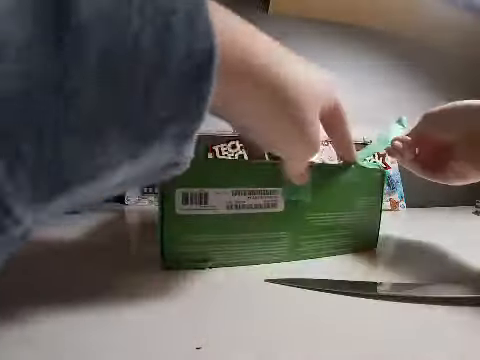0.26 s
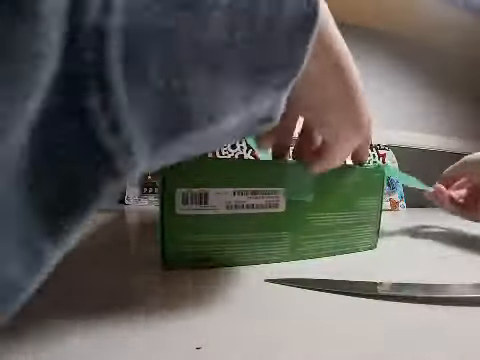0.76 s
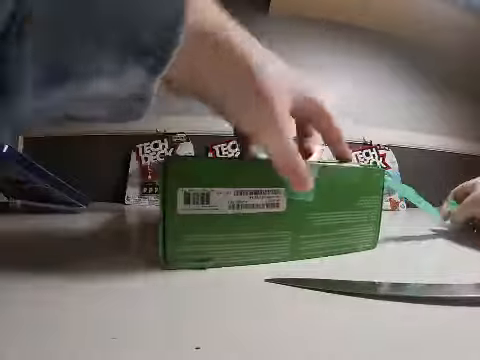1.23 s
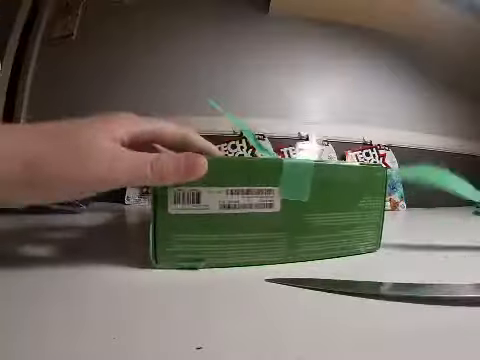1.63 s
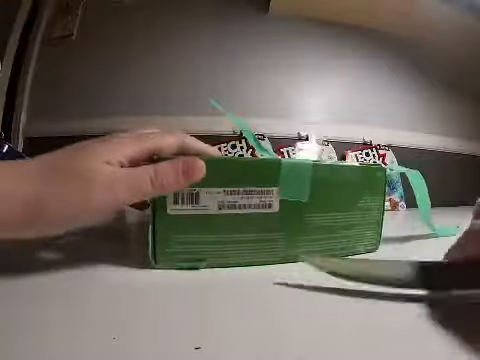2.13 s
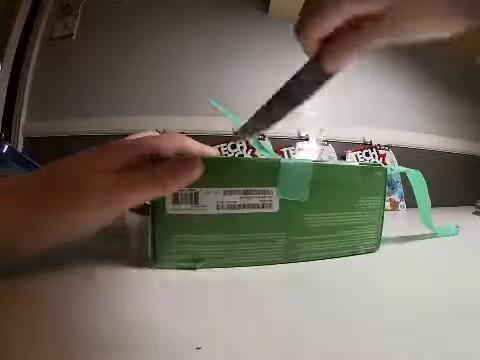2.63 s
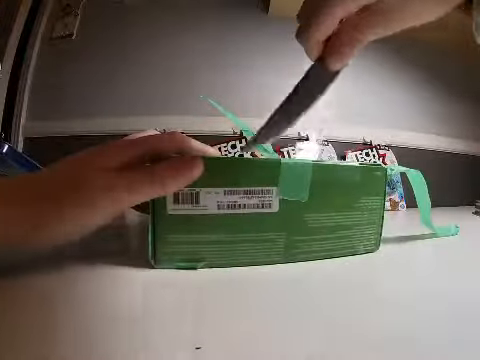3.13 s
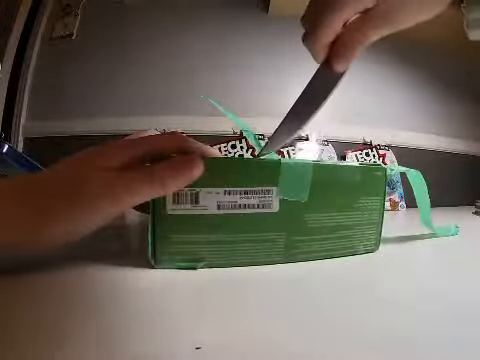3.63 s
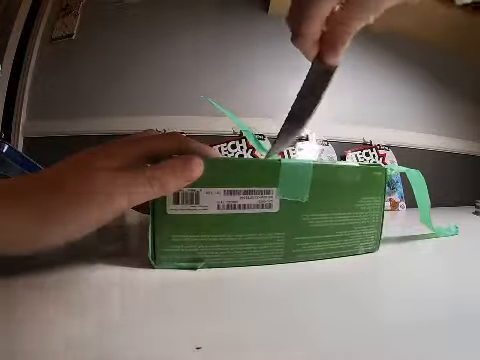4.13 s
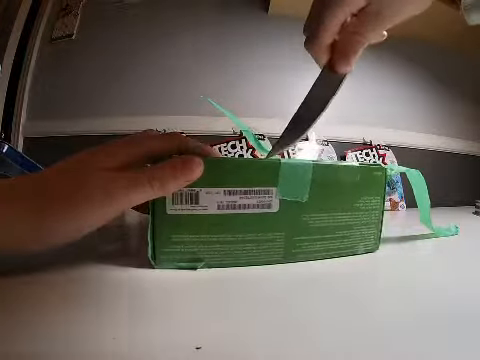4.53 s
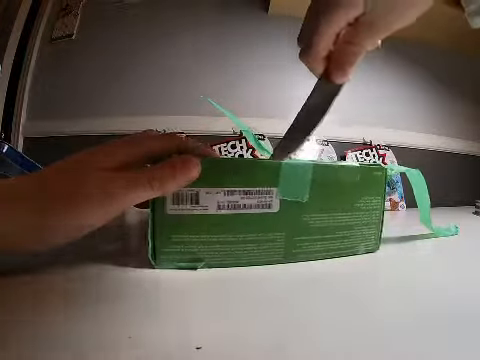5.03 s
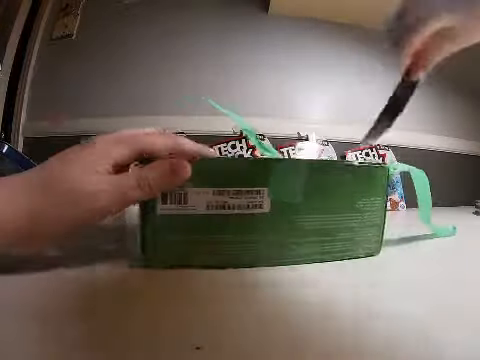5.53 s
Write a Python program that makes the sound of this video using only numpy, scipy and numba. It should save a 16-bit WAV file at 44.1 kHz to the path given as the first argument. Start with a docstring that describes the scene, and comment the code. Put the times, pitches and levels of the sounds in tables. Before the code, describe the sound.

A close, nearly mono desk-top scene in a small, quiet room. From 0 to 1.4 s, tape comes off a light cardboard box in uneven, gritty jerks: a strong hollow finger knock at 0.2, rips and snaps around 0.4, 0.8, 1.03 and 1.35, with low papery rubs, faint sliding squeaks and soft sleeve hiss between. Sparser snaps follow at 1.7 and 1.8, then a box bump at 1.97. At 2.3 a knife leaves the desk with one loud, hard, short clack. Around 2.75 to 3.25 the blade taps and scratches thinly, with a fuller thump at 3.24. It is mostly quiet until 4.3, apart from a dull tap at 3.6; then tiny woody catches and scrapes build from 4.6. At 5.07 to 5.25 the seam rips in loud crackling tears and heavy hollow thuds. Small scratches at 5.5 and a tick at 5.75 end it. A low, wavering hum swells and drops over faint room noise.

```python
"""Packing tape is peeled off a small cardboard box on a desk: bursts of stick-slip grit through gliding resonances.
Tape and blade tick and snap (ringing noise bursts); the strip sings (narrow resonances).
Fingers rub and knock the box (ringing modes); a knife is taken up with a clack, then pokes, scratches and
rips the seam: grit through film and card resonances. A sleeve swishes (comb-filtered hiss); a low hum
comes and goes over faint room noise. Close and nearly mono, with a short room tail."""
import sys
import numpy as np
from scipy import signal
from scipy.fft import rfft, irfft
from scipy.io import wavfile
from numba import njit

SR = 44100
rng = np.random.default_rng(int(sys.argv[2]) if len(sys.argv) > 2 else 0)


def dump(signal):
    """Clip the signal to [-1, 1] and save it as 16-bit WAV at the path in sys.argv[1]."""
    limited = np.clip(np.atleast_2d(signal).T, -1, 1)
    pcm = np.round(limited * 32767).astype(np.int16)
    wavfile.write(sys.argv[1], SR, pcm)


N = 254016
TIME = np.arange(N) / SR


def undb(db):
    """Decibels to gain."""
    return 10 ** (np.asarray(db) / 20)


def unit(x):
    """Scale to rms 1."""
    return x / np.sqrt(np.mean(x ** 2))


def at_peak(x, db):
    """Scale to a peak level in dB."""
    return x * undb(db) / np.abs(x).max()


def add(track, s, sound):
    """Mix a sound into the track at time s."""
    start = max(int(s * SR), 0)
    track[start:start + len(sound)] += sound[:max(N - start, 0)]


def low_pass(x, order, hz):
    """Butterworth low-pass."""
    return signal.sosfilt(signal.butter(order, hz, fs=SR, output="sos"), x)


def band(x, hz, q):
    """Two-pole resonance, gain 1 at the centre."""
    g = np.tan(np.pi * min(hz / SR, 0.45))
    numerator = [g / q, 0, -g / q]
    denominator = [1 + g / q + g * g, 2 * (g * g - 1), 1 - g / q + g * g]
    return signal.lfilter(numerator, denominator, x)


@njit
def sweep(x, hz, q):
    """Two-pole resonance whose centre moves, gain 1 at the centre."""
    out, b, low = np.empty(len(x)), 0., 0.
    for i in range(len(x)):
        g = np.tan(np.pi * min(hz[i] / SR, .45))
        v = (b + g * (x[i] - low)) / (1 + g * (g + 1 / q))
        b, low, out[i] = 2 * v - b, low + 2 * g * v, v / q
    return out


def colour(x, points, tilt_db=0):
    """Shape a spectrum by (Hz, dB) points and a tilt in dB per octave; rms 1."""
    hz, db = np.transpose(points)
    octave = np.log2(np.maximum(np.fft.rfftfreq(len(x), 1 / SR), 10))
    gain = undb(np.interp(octave, np.log2(hz), db) + tilt_db * octave)
    return unit(irfft(rfft(x) * gain, len(x)))


def fade(t60, count):
    """Exponential decay, 60 dB down after t60 seconds."""
    return undb(-60 * TIME[:count] / t60)


def ring(modes, count=22050):
    """Blow response of (Hz, dB, t60 s) modes, each shifted slightly at random per contact point."""
    out = np.zeros(count)
    for hz, db, t60 in modes:
        shifted_hz = hz * (1 + 0.015 * rng.standard_normal())
        out += undb(db) * fade(t60, count) * np.sin(2 * np.pi * shifted_hz * TIME[:count])
    return out


def walk(rate):
    """Smooth random curve, spread near 1, with rate knots per second."""
    knots = rng.standard_normal(4096)
    return np.interp(TIME * rate, np.arange(len(knots)), knots)


def slips(rate, spread_db):
    """Stick-slip: tiny releases at random moments, rate per second, of very uneven size."""
    released = rng.random(N) < rate / SR
    size = rng.standard_normal(N)
    return released * size * undb(spread_db * np.clip(rng.standard_normal(N), -2, 2))


def pull(length, attack_s):
    """Force through a stroke: it swells to a rounded top and lets go."""
    times_s = [0, min(attack_s, 1.12 * length), length]
    return np.sin(np.interp(TIME[:int(length * SR)], times_s, [0, np.pi / 2, 0])) ** 1.34


def swell(s, length, attack_s, release_s):
    """Gain that rises at time s, holds and falls."""
    return np.clip(np.minimum((TIME - s) / attack_s, (s + length - TIME) / release_s), 0, 1)


def delayed(x, ms):
    """The sound after a longer path; the delay may move."""
    return np.interp(TIME - ms / 1000, TIME, x)


def crack(hz, top_hz):
    """A sudden release: one sharp edge, a few milliseconds of crackle, a faint rustle."""
    tail_db, tail_t60_s = -21.5, 0.14
    burst = rng.standard_normal(8192)
    burst *= fade(0.01, count=8192) + undb(tail_db) * fade(tail_t60_s, count=8192)
    burst[0] += 2.0
    return band(low_pass(burst, 3, min(top_hz, 0.45 * SR)), hz, q=0.94)


# ring of blade and stiff tape under every scrape: ring_hz, ring_db
SCRAPE_RING = [(835, 4), (1350, -20.5), (2215, 0.5), (3290, -25), (3570, -6), (3820, -5.5), (4820, -20.5),
               (6300, -15), (7850, -12), (9900, -8.5)]
CATCHES_PER_S = 35  # glue and blade catch and let go unevenly


def grit(rate, rough_db, catch_db):
    """Dense slips that come in bursts and ring the blade and the stiff tape."""
    burst_db = rough_db * walk(rate=330) + catch_db * walk(rate=CATCHES_PER_S)
    x = slips(rate, spread_db=1.5) * undb(burst_db)
    return x + sum(undb(db) * band(x, hz, q=28) for hz, db in SCRAPE_RING)


WANDER_OCTAVES, WANDER_PER_S = 0.011, 30  # the point of contact moves
FILM_Q = 10


def scrape(source, surface, s, force, tilt_db, rings):
    """Grit under a changing force, through wandering (Hz, dB, Q) resonances."""
    scratch = colour(source[int(s * SR):][:len(force)], surface, tilt_db)
    wander = 2 ** (WANDER_OCTAVES * walk(rate=WANDER_PER_S)[:len(force)])
    ringing = sum(undb(db) * sweep(scratch, hz * wander, float(q)) for hz, db, q in rings)
    return force * unit(scratch + ringing)


# pulls that peel tape off card: release_s, build_s, t60_s, level_db, tilt_db_per_octave,
# strip_hz (at release), glide_octaves_per_s
PEELS = [(0.135, 0.044, 0.11, -50.5, 12, 12500, 0), (0.18, 0.035, 0.18, -35, 0.5, 2800, -2),
         (0.375, 0.03, 0.17, -42.5, 1, 6500, -10), (0.414, 0.007, 0.16, -33, -0.5, 5700, 3),
         (0.5, 0.2, 0.2, -54.5, 5, 2800, 5), (0.58, 0.27, 0.28, -54, -0.5, 2000, -0.5),
         (0.67, 0.053, 1, -56, -2, 2180, 1), (0.762, 0.063, 0.073, -44.5, 2.5, 8350, -1),
         (0.8, 0.004, 0.14, -34, 4.5, 7740, -0.5), (1.029, 0.015, 0.026, -28, -1, 3500, -3),
         (1.04, 0.015, 0.32, -38, 6.5, 3230, 0), (1.168, 0.015, 0.055, -31.5, -5.5, 2040, -32),
         (1.305, 0.04, 0.19, -45, -0.5, 1450, 11), (1.326, 0.0065, 0.07, -41, 0, 4560, -3),
         (1.362, 0.022, 0.014, -31.5, 0, 5350, 11), (1.366, 0.043, 0.23, -43, 0, 2100, -5.5),
         (1.683, 0.027, 0.082, -37, 3.5, 2490, 1), (1.99, 0.013, 0.18, -46.5, 4, 4920, -1.5)]
# tape lifting off the card: freq_hz, rel_level_db
PEEL_COLOUR = [(150, -6), (400, 12), (900, 2.5), (1500, 5.5), (2000, -1), (2900, -3), (3700, -6.5),
               (5000, -3), (6500, -4.5), (8200, -7.5), (9200, -14), (10200, -17.5), (11800, -32),
               (15000, -35.5)]
PEEL_RING_DB = 7.5  # strip ring re rustle


def peeling():
    """The pull builds until the glue lets go, then dies away; the ring of the strip glides."""
    out = np.zeros(N)
    glue = grit(rate=4000, rough_db=-0.9, catch_db=3.1)
    for release_s, build_s, t60, db, tilt_db, film_hz, glide in PEELS:
        start_s = release_s - build_s
        build = np.linspace(0, 1, int(build_s * SR))
        force = undb(db) * np.r_[build, fade(t60, count=int(t60 * SR))]
        pitch_hz = film_hz * 2 ** (glide * (TIME[:len(force)] - build_s))
        rings = [(pitch_hz, PEEL_RING_DB, FILM_Q)]
        add(out, start_s, scrape(glue, PEEL_COLOUR, start_s, force, tilt_db, rings))
    return out


# sharp ticks and snaps of tape and blade: start_s, peak_db, centre_hz, top_hz, ring_low_hz, ring_high_hz
SNAPS = [(0.1054, -20.5, 2130, 5200, 1590, 3140), (0.131, -33, 8000, 15000, 9500, 12500),
         (0.154, -39, 5000, 14000, 2300, 12960), (0.168, -27, 5000, 14000, 2780, 5850),
         (0.174, -18.5, 1120, 13000, 1120, 2730), (0.368, -33, 8000, 15000, 6700, 11000),
         (0.371, -28, 7000, 15000, 6700, 12600), (0.411, -19.5, 6000, 14800, 4000, 5640),
         (0.7965, -20, 6900, 10000, 4700, 7200), (1.018, -24.5, 3040, 9650, 1580, 3400),
         (1.0232, -15.5, 5500, 10600, 3250, 5840), (1.027, -19.5, 5550, 10600, 4370, 7300),
         (1.3565, -22.5, 2030, 7500, 2120, 4930), (1.426, -26.5, 3160, 7860, 3350, 6400),
         (1.645, -41, 1830, 6000, 1474, 2680), (1.6645, -25, 3550, 9650, 2300, 8500),
         (1.681, -16, 2550, 9800, 2300, 3100), (1.687, -22.5, 4550, 9650, 4900, 7400),
         (1.834, -17, 3060, 9500, 3250, 7300), (1.967, -26.5, 4160, 9650, 2000, 5230),
         (1.991, -41, 3050, 9650, 3330, 4800), (2.041, -36.5, 4500, 8400, 3250, 5400),
         (2.1035, -36, 1720, 8000, 1520, 2410), (2.327, -46, 7500, 8870, 6700, 7750),
         (2.756, -33, 5010, 8900, 3980, 7500), (2.9681, -35, 4400, 9700, 4030, 6600),
         (3.1592, -19.5, 3430, 9000, 2460, 5300), (3.2405, -29, 5900, 9000, 5770, 7270),
         (3.627, -39.5, 6000, 9000, 5400, 7200), (4.675, -42, 4040, 7500, 4070, 6600),
         (4.925, -37, 4500, 7480, 3800, 6260), (4.983, -44, 2940, 9750, 2670, 6600),
         (5.1476, -10, 3950, 11500, 3500, 3900), (5.1662, -8.5, 1570, 6500, 1230, 1550),
         (5.1698, -22.5, 6960, 10500, 6850, 10140), (5.2308, -22.5, 4300, 8030, 4250, 4700),
         (5.7479, -23.5, 5300, 10000, 4660, 6600)]
SNAP_RING_DB = -7  # each ring re crack


def ticks_and_snaps():
    """A sharp crack with two ringing pitches."""
    out = np.zeros(N)
    for s, db, hz, top_hz, *rings_hz in SNAPS:
        snap = unit(crack(hz, top_hz))
        ringing = sum(unit(band(snap, ring_hz, q=FILM_Q)) for ring_hz in rings_hz)
        add(out, s + 0.00045, at_peak(snap + undb(SNAP_RING_DB) * ringing, db))
    return out


# stretched strip singing as it slides: start_s, length_s, level_db, pitch_hz, glide_octaves_per_s
SINGS = [(0.45, 0.3, -52, 721, -1.84), (0.456, 0.31, -55.5, 1976, -0.6), (0.474, 0.61, -57.5, 2340, 0.3),
         (0.424, 0.31, -62, 2950, -0.7), (0.692, 0.033, -48.5, 5300, 5), (0.7, 0.074, -57, 6100, -0.5),
         (0.865, 0.14, -52.5, 1514, -1.4), (1.07, 0.15, -62, 3300, 0.5), (1.166, 0.0246, -51, 2510, -38),
         (1.36, 0.11, -60, 2290, -3), (1.466, 0.37, -60.5, 1455, 2.7)]
SING_Q, SING_ATTACK_S = 18, 0.048


def singing():
    """Friction rings the stretched strip in narrow resonances that glide as its free length changes."""
    out = np.zeros(N)
    friction = slips(rate=1200, spread_db=2)
    for s, length, db, hz, glide in SINGS:
        force = pull(length, SING_ATTACK_S)
        pitch_hz = hz * 2 ** (glide * TIME[:len(force)])
        drag = friction[int(s * SR):][:len(force)]
        tone = sweep(sweep(drag, pitch_hz, float(SING_Q)), pitch_hz, SING_Q / 2)
        add(out, s, undb(db) * force * unit(tone))
    return out


# fingers and taut tape dragging on card: start_s, length_s, level_db, drum_hz, glide_octaves_per_s
RUBS = [(0.05, 0.14, -35.5, 217, -5), (0.118, 0.18, -32, 513, -2), (0.257, 0.22, -41.5, 440, -2),
        (0.357, 0.15, -31.5, 524, -2.5), (0.474, 0.12, -49, 306, 6.5), (0.696, 0.14, -42.5, 397, -2.5),
        (0.86, 0.28, -43.5, 322, -1), (1.046, 0.12, -41, 314, -1), (1.153, 0.024, -28.5, 710, -9),
        (1.182, 0.11, -42, 615, -12), (1.238, 0.057, -39.5, 600, -7), (1.311, 0.096, -35.5, 473, -4.5),
        (1.455, 0.07, -63, 490, -6), (1.611, 0.059, -42, 274, -1), (1.993, 0.14, -40.5, 450, -3),
        (2.093, 0.069, -42, 540, 4), (5.063, 0.11, -33, 375, 0.5), (5.21, 0.078, -40, 330, 3),
        (5.509, 0.11, -43, 400, 3), (5.544, 0.066, -48, 620, 0)]
# card under a dragging finger: freq_hz, rel_level_db
RUB_COLOUR = [(40, -30), (90, 1), (180, 6.5), (320, -5), (600, -2), (950, -13), (1500, -13.5), (2800, -26),
              (6000, -29.5), (15000, -56)]
RUB_ATTACK_S, RUB_Q, RUB_RING_DB = 0.021, 3.8, 9.5  # drumming re judder


def rubbing():
    """Skin and tape judder over the card; the wall drums along at a pitch that slides."""
    out = np.zeros(N)
    judder = colour(slips(rate=1100, spread_db=0.5), RUB_COLOUR)
    for s, length, db, hz, glide in RUBS:
        force = pull(length, RUB_ATTACK_S)
        drag = judder[int(s * SR):][:len(force)]
        drum = sweep(drag, hz * 2 ** (glide * TIME[:len(drag)]), float(RUB_Q))
        add(out, s, undb(db) * force * unit(drag + undb(RUB_RING_DB) * drum))
    return out


# blows of fingers and blade on the box: start_s, peak_db, push_hz, tick_peak_db, tick_top_hz
KNOCKS = [(0.054, -22, 260, -30.5, 1220), (0.175, -8, 410, -13.5, 1450), (0.187, -20.5, 156, -32, 1000),
          (0.278, -32, 306, -36, 1500), (0.382, -18.5, 470, -43, 1200), (0.411, -18, 390, -22.5, 4000),
          (0.443, -25.5, 145, -40, 1500), (0.637, -37, 298, -43, 2200), (0.679, -33.5, 340, -39.5, 2000),
          (0.715, -35, 304, -45, 1200), (1.028, -20, 114, -44, 3020), (1.166, -30, 653, -38, 2410),
          (1.195, -27, 222, -42, 1200), (1.244, -18, 400, -34.5, 3240), (1.3, -32, 450, -34, 2000),
          (1.323, -33, 405, -44, 2000), (1.347, -16, 356, -29, 2030), (1.687, -32, 131, -30, 3000),
          (1.633, -41, 117, -49, 1500), (1.735, -31.5, 112, -56, 1500), (1.967, -12.5, 197, -20, 8020),
          (1.99, -17, 114, -32, 1980), (2.068, -41, 295, -37, 1980), (2.755, -21.5, 259, -26.5, 4100),
          (2.97, -28, 198, -35.5, 7900), (3.061, -24, 410, -28, 3030), (3.068, -27.5, 171, -43, 1200),
          (3.159, -23.5, 326, -41, 7000), (3.24, -29.5, 370, -27.5, 3930), (3.24, -14, 178, -35, 4000),
          (3.627, -22.5, 161.5, -34.5, 2220), (4.447, -35, 152, -50, 4000), (4.676, -35, 176, -40, 3000),
          (4.745, -29, 217, -53, 6000), (4.925, -29, 147, -48, 2000), (5.069, -27.5, 143, -35, 6900),
          (5.117, -17, 161, -17, 6000), (5.149, -11, 172, -19, 4950), (5.168, -5, 235, -15, 2500),
          (5.184, -10.5, 98, -39, 1490), (5.219, -14.5, 193, -26, 2500), (5.235, -12, 132, -30, 1780),
          (5.53, -37, 167, -33, 5000), (5.729, -36.5, 142, -47, 5000)]
# modes of the hollow box: mode_hz, rel_level_db, t60_s
BOX = [(99.1, -4.5, 0.25), (147, -2.5, 0.046), (172, -6, 0.053), (245.8, -15.5, 0.25), (327, -2.5, 0.009),
       (333, -19.5, 0.28), (410, -4.5, 0.044), (486, -9, 0.021), (537, -15.5, 0.14), (610, -17, 0.025),
       (835, -16, 0.11), (1030, -13.5, 0.046), (1115, 0, 0.0037), (1338, -12, 0.084), (1460, -20.5, 0.2)]
BOX_RING_DB = 6  # box ring re wall flex
FLEX_CYCLES = 8.4  # flex is 60 dB down after this many cycles of push_hz
FLEX_START, FLEX_END, FLEX_SETTLE_CYCLES = 1.537, 0.72, 1  # pitch re push_hz as the dent relaxes


def box_knocks():
    """A blow flexes the wall for a few cycles and rings the box; a lower push favours lower modes."""
    out = np.zeros(N)
    give_s = 0.001104  # the wall gives way before it swings back
    for s, db, hz, _, _ in KNOCKS:
        body = ring(BOX)
        loose_flaps = colour(rng.standard_normal(4096), RUB_COLOUR) * fade(0.04, count=4096)
        add(body, 0, undb(1.5) * loose_flaps)
        body = band(body, hz, q=1.0)
        settle = np.exp(-hz * TIME[:len(body)] / FLEX_SETTLE_CYCLES)
        pitch_hz = hz * (FLEX_END + (FLEX_START - FLEX_END) * settle)
        swing = np.sin(2 * np.pi * np.cumsum(pitch_hz) / SR) * fade(FLEX_CYCLES / hz, len(body))
        flex = band(swing, 0.89 * hz, q=1.0)
        blow = at_peak(flex, 0) + at_peak(body, BOX_RING_DB)
        # a small box radiates no deep bass, and soft card no treble
        blow = signal.sosfilt(signal.butter(2, [80, 2400], "band", fs=SR, output="sos"), blow)
        add(out, s + give_s, at_peak(blow, db))
    return out


def contact_ticks():
    """Fingers and blade tick as they land: a short crack at the start of every knock."""
    out = np.zeros(N)
    for s, _, _, db, top_hz in KNOCKS:
        add(out, s + 0.00054, at_peak(crack(1230, top_hz), db))
    return out


# knife taken up from the desk: start_s, clack_peak_db, desk_ring_db
KNIFE_KNOCKS = [(1.969, -44, -15.5), (2.065, -38, -27.5), (2.2755, -2, -25)]
# modes of the clack: mode_hz, rel_level_db, t60_s
CLACK = [(522, -27, 0.05), (1245, -8, 0.06), (1580, 3, 0.022), (1780, 1.5, 0.012), (1900, 0, 0.0015),
         (2230, -21, 0.05), (2600, -2, 0.013), (2900, -16, 0.029), (4300, -7.5, 0.012),
         (5300, -18.5, 0.008), (8300, -21, 0.006)]
# the clack as the walls return it: freq_hz, rel_level_db
CLACK_ECHO = [(150, -4.5), (500, 0), (900, -2), (1280, 6), (1800, -3.5), (2300, -10.5), (2900, -7.5),
              (3600, -16.5), (4400, -20), (6000, -28.5), (12000, -61.5)]
DESK_HZ, DESK_T60_S = 176.3, 0.21
LEAD_IN_S, LEAD_IN_DB, ECHO_DB = 0.025, -31, -27.5  # levels re clack


def knife_knocks():
    """Noise coloured like the clack fades in over 25 ms; a hard, short clack follows and the desk rings."""
    out = np.zeros(N)
    for s, clack_db, desk_db in KNIFE_KNOCKS:
        # the contact lasts a fraction of a millisecond, which rounds off the top
        clack = low_pass(ring(CLACK), 4, 6200)
        count = len(clack)
        echo = colour(rng.standard_normal(count), CLACK_ECHO) * fade(0.36, count)
        echo *= 1 - fade(0.006, count)  # the walls answer a moment later
        lead_in = unit(signal.fftconvolve(rng.standard_normal(count), clack)[:count])
        lead_in = (lead_in * fade(0.056, count))[:int(LEAD_IN_S * SR)][::-1]
        add(out, s - LEAD_IN_S, undb(clack_db + LEAD_IN_DB) * lead_in)
        add(out, s, undb(clack_db) * (at_peak(clack, 0) + undb(ECHO_DB) * echo))
        add(out, s, undb(desk_db) * ring([(DESK_HZ, 0, DESK_T60_S)]))
    return out


# blade strokes along the seam: start_s, length_s, swell_s, level_db, tilt_db_per_octave,
# film_hz, film_db (re scratch), card_hz
STROKES = [(2.767, 0.19, 0.018, -56, 0, 7260, 3, 1350), (2.835, 0.05, 0.03, -47.5, 4.5, 6640, 8.5, 1530),
           (2.969, 0.14, 0.022, -40.5, 2, 5550, 0.5, 1120), (2.988, 0.013, 0.0079, -42, 7, 5540, 20, 1090),
           (3.085, 0.059, 0.034, -35, 5.5, 5800, 6, 1130), (3.127, 0.03, 0.032, -39, 2, 7600, 9, 1090),
           (3.285, 0.11, 0.042, -51.5, 1, 5800, 4, 1480), (3.467, 0.051, 0.026, -50, 4, 5730, 5, 1380),
           (4.322, 0.067, 0.012, -56.5, -0.5, 3526, 0.5, 1637),
           (4.565, 0.061, 0.038, -60, 2, 6830, 5, 1310), (4.615, 0.022, 0.014, -54.5, -3.5, 3800, -8, 1500),
           (4.675, 0.045, 0.0041, -51, -4, 4300, -7.5, 990), (4.69, 0.061, 0.07, -46.5, 0, 4180, 2.5, 1030),
           (4.742, 0.07, 0.0031, -43, -4.5, 6300, 7, 1330), (4.86, 0.11, 0.061, -46, -3.5, 6400, -6, 1400),
           (4.955, 0.082, 0.013, -44.5, -4, 6500, -9, 1070),
           (5.025, 0.068, 0.022, -44.5, -4, 6240, -1, 1290), (5.24, 0.12, 0.026, -40, -4, 4070, -14, 1410),
           (5.453, 0.067, 0.036, -47, -2.5, 2290, 8, 1340), (5.497, 0.054, 0.023, -43.5, 6, 5380, 14, 1520)]
# separate tears as the blade rips through; same columns: start_s, length_s, swell_s, level_db,
# tilt_db_per_octave, film_hz, film_db (re scratch), card_hz
TEARS = [(5.072, 0.027, 0.003, -40.5, 0.5, 3600, 9.5, 1380),
         (5.092, 0.023, 0.0086, -29.5, 0.5, 6300, 1, 970), (5.102, 0.026, 0.014, -25, 2, 3700, 7, 1000),
         (5.121, 0.025, 0.0074, -32, 2, 3500, -1, 1400), (5.136, 0.014, 0.0081, -18, 1, 3750, 5, 1495),
         (5.15, 0.027, 0.0038, -31.5, 3, 3800, -8, 1470), (5.165, 0.014, 0.0033, -14, -6, 2700, -11, 1300),
         (5.174, 0.14, 0.0031, -40.5, -4, 4200, 4, 1410)]
# blade in tape and card: freq_hz, rel_level_db
CUT_COLOUR = [(150, -3.5), (400, 13), (620, 4), (1000, 3.5), (1450, 5), (2100, -4.5), (2600, -1),
              (3100, -3), (3950, -1), (5100, -4.5), (6000, -2.5), (7900, -8.5), (9300, -18.5),
              (10200, -16.5), (11800, -38), (15000, -36)]
CARD_Q, CARD_DB = 8.1, 3  # card ring re scratch


def cutting():
    """The blade slides over fine grit in its strokes; in the tears, fibres break in a coarse crackle."""
    out = np.zeros(N)
    fine = grit(rate=16000, rough_db=0.5, catch_db=2.5)
    coarse = grit(rate=3800, rough_db=-0.5, catch_db=2.5)
    for table, source in (STROKES, fine), (TEARS, coarse):
        for s, length, swell_s, db, tilt_db, film_hz, film_db, card_hz in table:
            force = undb(db) * pull(length, swell_s)
            rings = [(film_hz, film_db, FILM_Q), (card_hz, CARD_DB, CARD_Q)]
            add(out, s, scrape(source, CUT_COLOUR, s, force, tilt_db, rings))
    return out


# knife tip catching in the card: start_s, peak_db, ring_hz
TIP_CATCHES = [(2.969, -33, 980), (3.061, -37, 750), (3.1595, -27, 1035), (4.362, -53.5, 1750),
               (4.446, -46.5, 1360), (4.624, -45.5, 1460), (4.675, -34.5, 990), (4.727, -41, 1070),
               (4.745, -30.5, 1390), (4.865, -47.5, 780), (4.924, -41.5, 1220), (4.962, -39.5, 1120),
               (4.995, -40, 686), (5.036, -49, 1390)]
TIP_T60_S, TIP_CRUNCH_DB = 0.025, -13  # card ring decay; fibre crunch re ring


def tip_catches():
    """The point of the blade digs in and jumps free: a small crunch and a woody ring."""
    out = np.zeros(N)
    for s, db, hz in TIP_CATCHES:
        crunch = crack(hz, top_hz=2100)
        card = ring([(hz, 0, TIP_T60_S)], count=len(crunch))
        add(out, s + 0.00038, at_peak(unit(card) + undb(TIP_CRUNCH_DB) * unit(crunch), db))
    return out


# sleeve sliding as the arm moves: start_s, length_s, rel_level_db
SWISHES = [(-0.15, 0.22, -35), (0.276, 0.93, -49.5), (1.392, 0.49, -48), (1.8, 0.43, -55),
           (5.46, 0.92, -47)]
# cloth hiss: freq_hz, rel_level_db
SWISH_COLOUR = [(200, 14.5), (450, 9), (650, 11), (850, 5), (1100, 1.5), (1500, 4), (2600, 1), (3500, 2),
                (5500, 1.5), (8000, 0), (9800, -9.5), (12000, -19.5), (15000, -22)]
# changing gap between sleeve and box: time_s, bounce_delay_ms
ARM_LAG = [(0.4, 1.16), (0.65, 1.04), (0.75, 1.04), (0.85, 0.63), (1.15, 0.61), (1.33, 0.52), (1.5, 0.73),
           (1.62, 0.67), (1.8, 0.67), (5.76, 0.7)]
SWISH_ATTACK_S, SWISH_RELEASE_S = 0.1, 0.34
SWISH_DB, ARM_BOUNCE_DB = -2.5, -12  # overall gain; loss per bounce


def sleeve():
    """Cloth hiss bouncing between sleeve and box: a comb of resonances that slides as the arm moves."""
    weave = slips(rate=14000, spread_db=4) * undb(1.3 * walk(rate=20))
    hiss = colour(weave, SWISH_COLOUR)
    lag_ms = np.interp(TIME, *np.transpose(ARM_LAG))
    bounces = sum(undb(k * ARM_BOUNCE_DB) * delayed(hiss, k * lag_ms) for k in (1, 2, 3))
    strokes = sum(undb(db) * swell(s, length, SWISH_ATTACK_S, SWISH_RELEASE_S)
                  for s, length, db in SWISHES)
    return undb(SWISH_DB) * (hiss + bounces) * strokes


# spells of the low hum: start_s, length_s, level_db (at start, before sag)
HUM = [(0.01, 0.69, -44.5), (1, 1.0, -36), (1.943, 0.37, -31.5), (2.653, 0.63, -44.5), (3.237, 0.18, -34),
       (3.387, 0.17, -43), (3.606, 0.71, -41), (4.298, 0.94, -62.5), (5.13, 0.32, -37.5)]
# partials of the hum: harmonic_number, rel_level_db
HUM_PARTIALS = [(1, 2.5), (3, -24), (5, -32)]
HUM_HZ, HUM_ATTACK_S, HUM_RELEASE_S, HUM_SAG_DB_PER_S = 59.4, 0.027, 0.15, 6
THROB_FROM_S, THROB_TO_S, THROB_HZ, THROB_DEPTH = 0.83, 2.39, 7.5, 0.75


def low_hum():
    """Wavering harmonic hum in spells that swell, sag and drop out; it throbs for a while."""
    phase = 2 * np.pi * np.cumsum(HUM_HZ * (1 + 0.022 * walk(rate=17))) / SR
    hum = unit(sum(undb(db) * np.sin(k * phase) for k, db in HUM_PARTIALS))
    spells = np.zeros(N)
    for s, length, db in HUM:
        sagging = undb(db - HUM_SAG_DB_PER_S * (TIME - s))
        spells += sagging * swell(s, length, HUM_ATTACK_S, HUM_RELEASE_S)
    throbbing = (TIME > THROB_FROM_S) * (TIME < THROB_TO_S)
    dips = np.cos(np.pi * THROB_HZ * (TIME - THROB_FROM_S)) ** 2 * throbbing
    return hum * spells * (1 - THROB_DEPTH * dips)


# quiet room noise: freq_hz, rel_level_db
FLOOR_COLOUR = [(25, -17.5), (60, -8.5), (130, -14.5), (200, -22), (300, -19.5), (520, -39.5), (800, -37),
                (1500, -43), (3000, -50), (5000, -49.5), (8000, -47.5), (10500, -62), (15000, -91.5)]
FLOOR_DB = -54


def room_noise():
    """Faint coloured noise with a slight random flutter in level."""
    air = colour(rng.standard_normal(N), FLOOR_COLOUR)
    return undb(FLOOR_DB) * air * undb(0.36 * walk(rate=96))


# reverberation: freq_hz, t60_s
ROOM_T60 = [(125, 0.45), (500, 0.073), (2000, 0.11), (8000, 0.47)]


def room(x):
    """Diffuse tail of the small room: octave bands of noise, each with its own decay."""
    hz, t60 = np.transpose(ROOM_T60)
    count = 26000
    tail = np.zeros(count)
    for centre_hz in 225 * 2 ** np.arange(7):
        band_t60 = np.interp(np.log(centre_hz), np.log(hz), t60)
        tail += band(rng.standard_normal(count), centre_hz, np.sqrt(2)) * fade(band_t60, count)
    tail *= 1 - fade(0.0076, count)  # the first echoes take a moment to arrive
    return signal.fftconvolve(x, tail / np.linalg.norm(tail))[:N]


# first reflections, from desk top and box wall: delay_ms, gain
BOUNCES = [(1.056, 0.029), (2.6, 0.042)]


def scene():
    """Sum the close sources with reflections and room; the channels differ only by a trace of room."""
    thuds = box_knocks() + rubbing()
    crisp = ticks_and_snaps() + contact_ticks() + peeling() + singing() + tip_catches() + cutting()
    crisp = crisp + sum(gain * delayed(crisp, ms) for ms, gain in BOUNCES)
    cloth = sleeve()
    mid = thuds + undb(-6.5) * room(thuds)
    mid = mid + crisp + undb(-19.0) * room(crisp)
    mid = mid + knife_knocks() + cloth + low_hum() + room_noise()
    side = undb(-40.5) * room(band(crisp + cloth, 6000, q=0.6))
    return np.array([mid + side, mid - side])


TOP_HZ = 15600


def record(dry):
    """Cut the deepest rumble with a gentle high-pass and the top with a steep low-pass."""
    dry = signal.sosfilt(signal.butter(3, 36, "high", fs=SR, output="sos"), dry)
    return signal.sosfilt(signal.ellip(8, 0.2, 70, TOP_HZ, fs=SR, output="sos"), dry)


dry = scene()
out = record(dry)
dump(out)
```